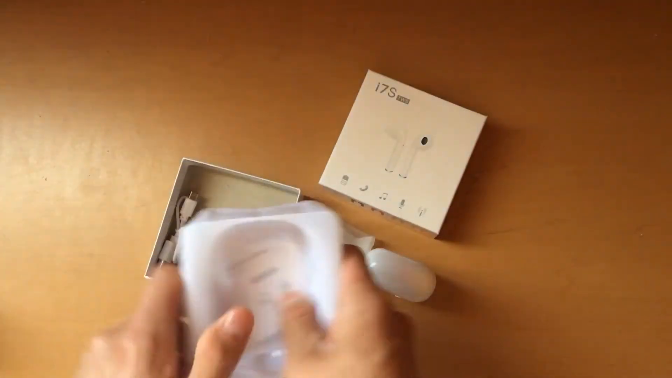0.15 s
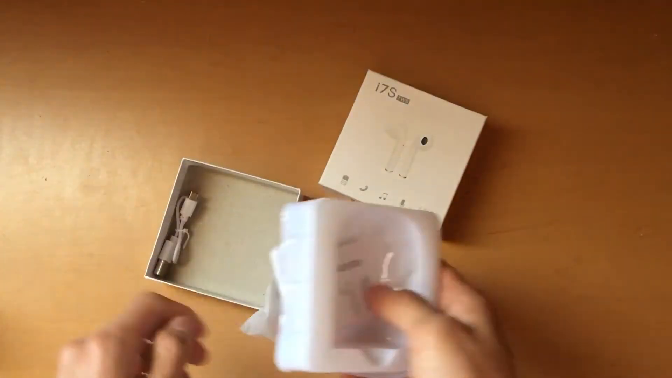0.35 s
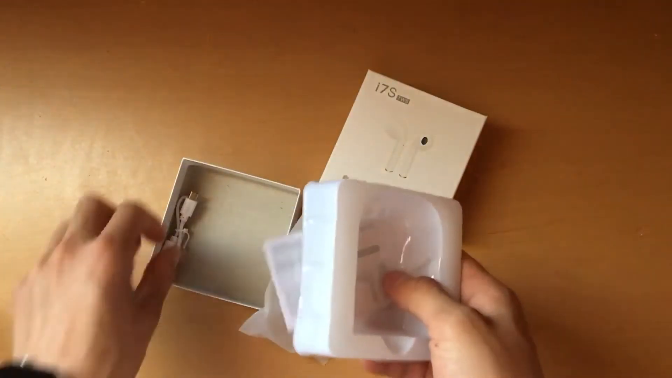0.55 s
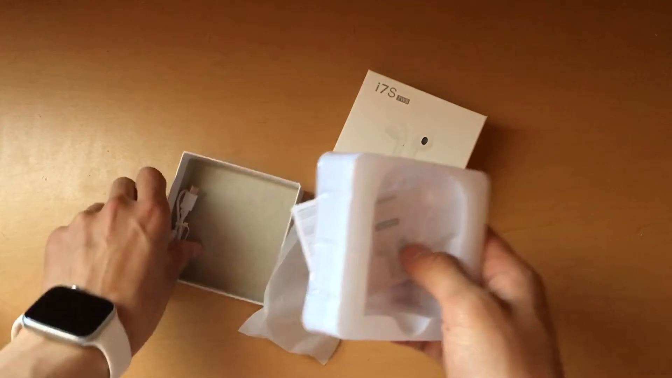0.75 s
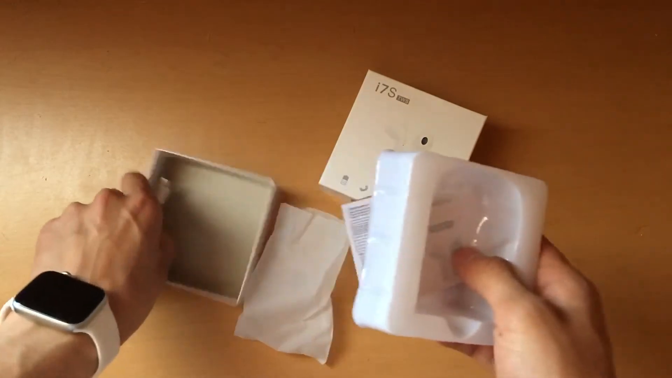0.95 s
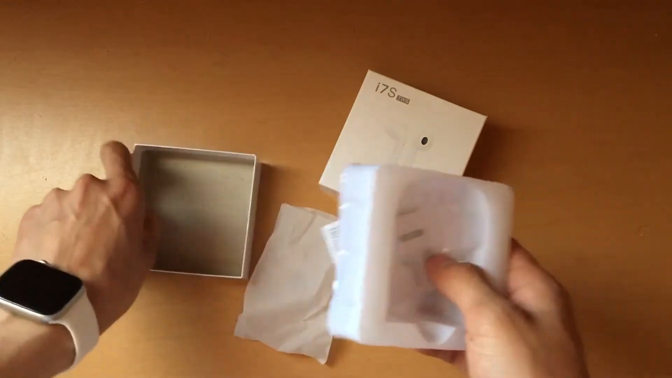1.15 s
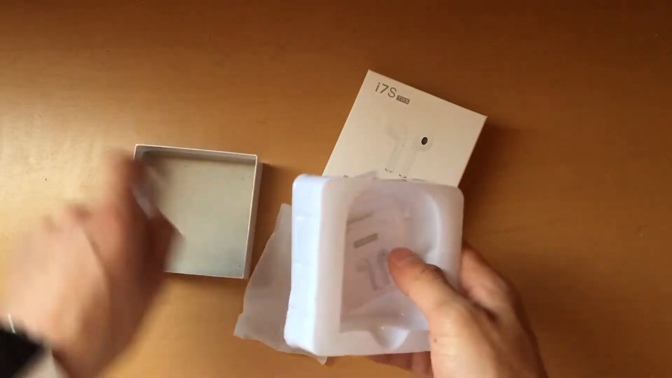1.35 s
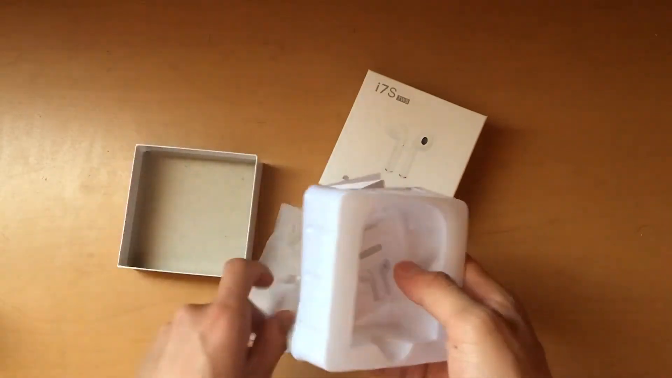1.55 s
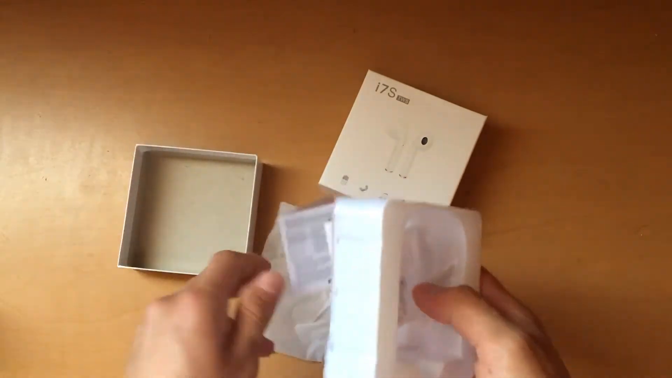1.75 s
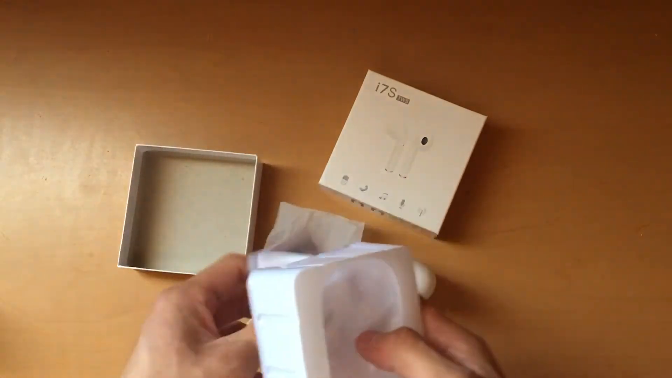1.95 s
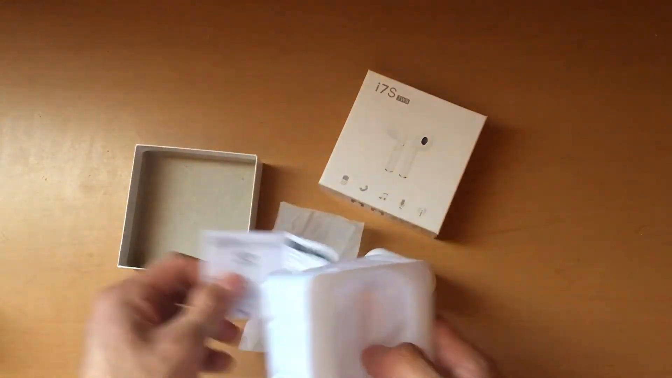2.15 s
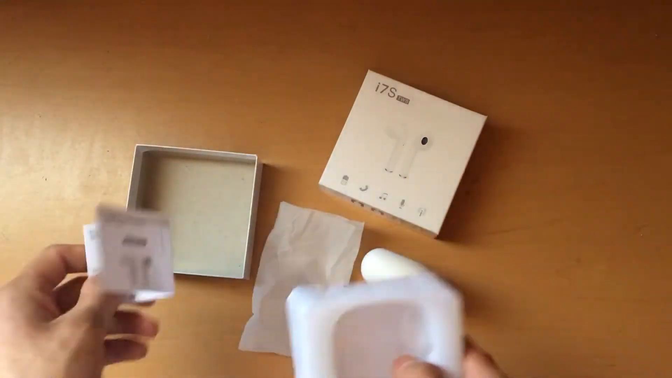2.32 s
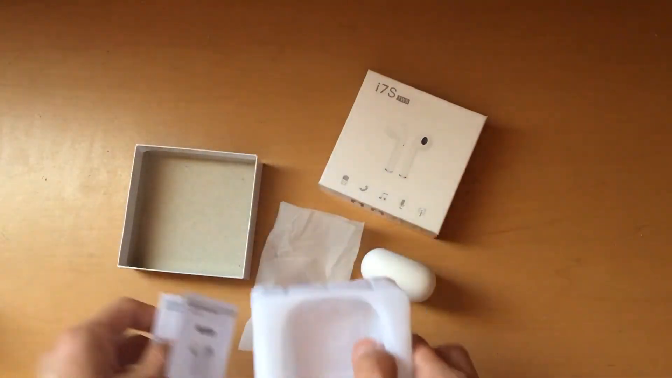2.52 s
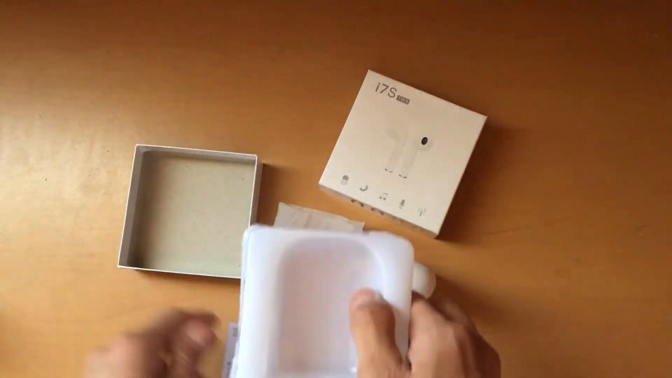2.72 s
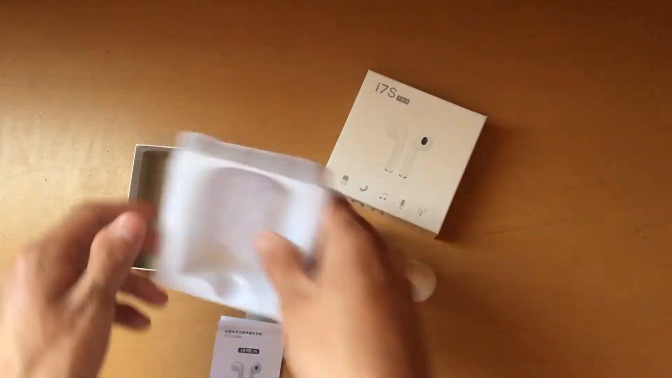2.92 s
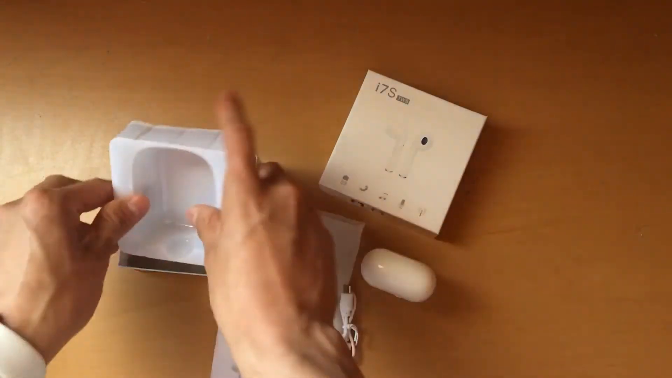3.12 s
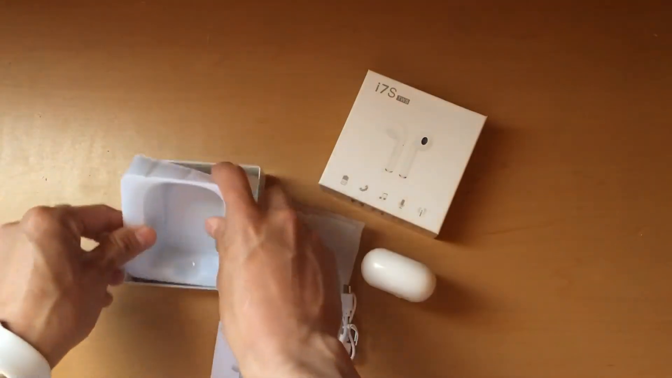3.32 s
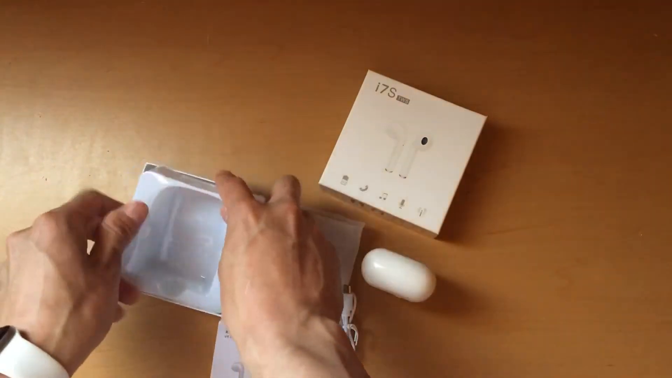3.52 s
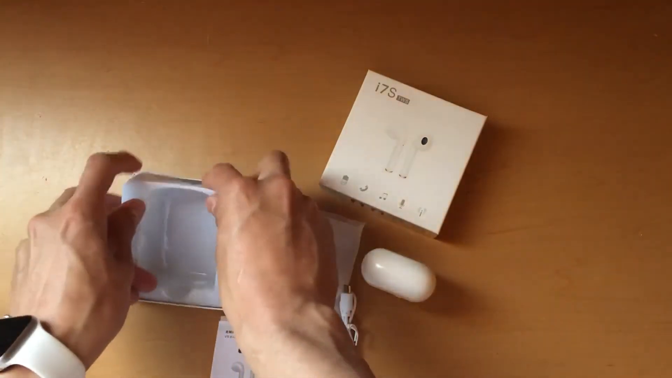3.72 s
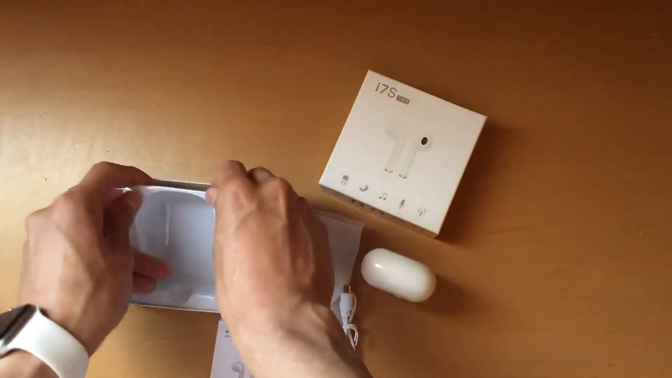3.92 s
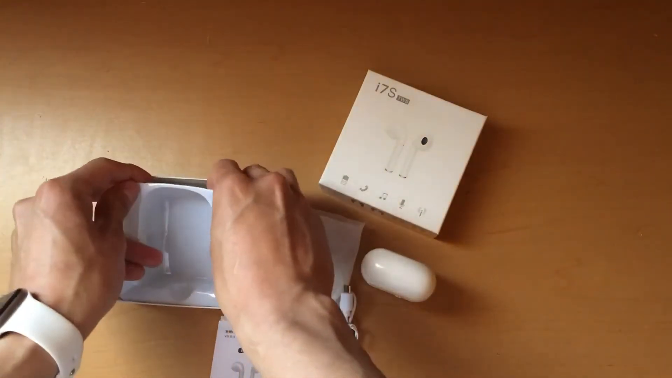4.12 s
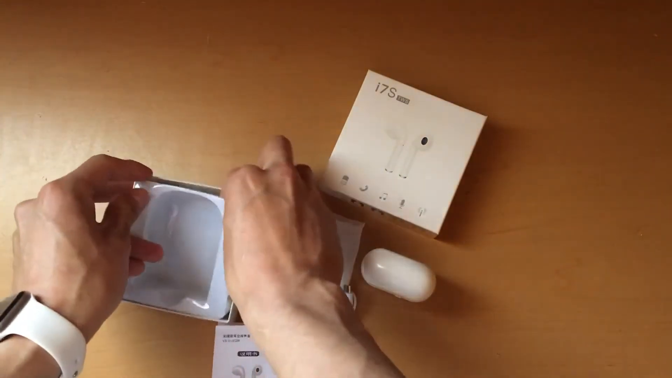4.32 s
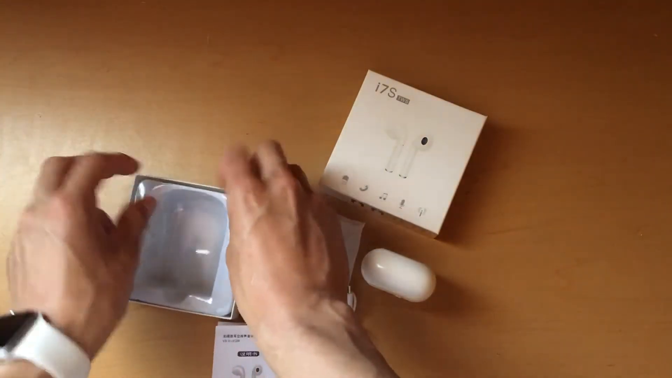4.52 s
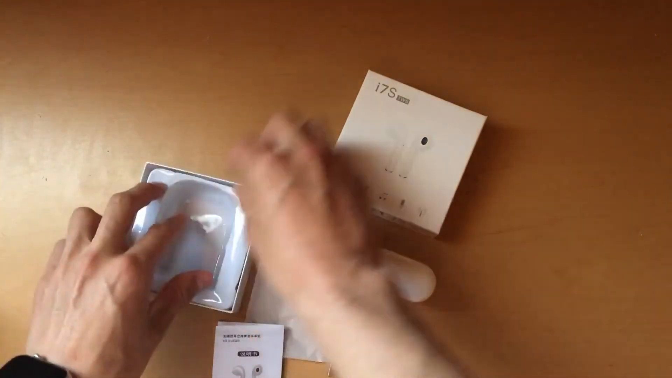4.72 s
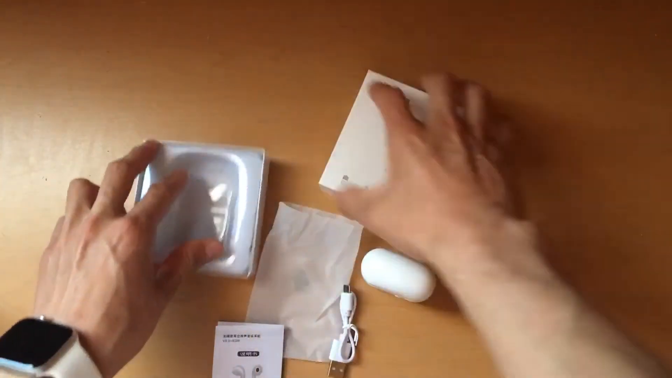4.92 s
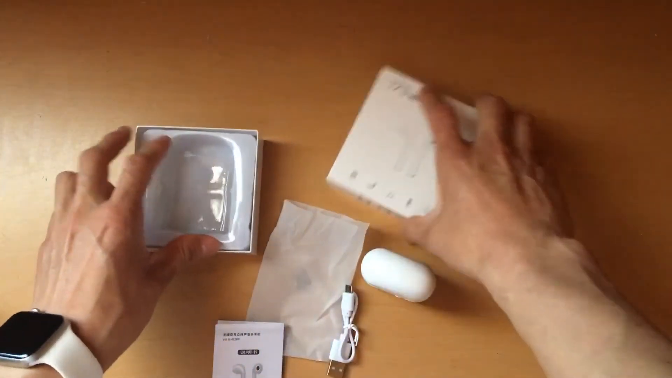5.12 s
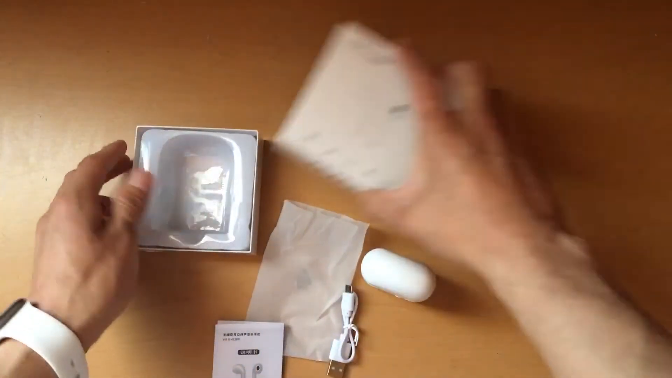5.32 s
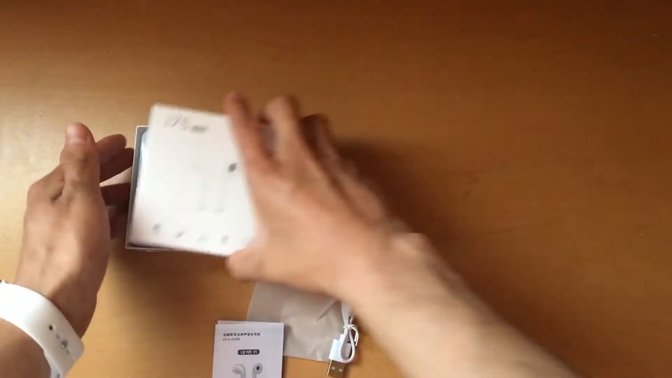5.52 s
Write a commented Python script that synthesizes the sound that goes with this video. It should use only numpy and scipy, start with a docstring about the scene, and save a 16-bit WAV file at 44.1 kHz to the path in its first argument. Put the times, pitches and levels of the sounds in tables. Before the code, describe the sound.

Unpacking sounds at a table: quick dry paper rubs, a sharp plastic crack with a dull thump, quieter rustling, then a busy run of crisp plastic snaps and coarse squeaky rubbing as the tray is forced back into its box. Muted box knocks sit underneath. A hollow cardboard scuff ends it, over faint low rumble and hiss, close and dry.

```python
"""In a small room, hands unpack a small cardboard box on a wooden table, close to the microphone.
A paper leaflet slides from under a thin plastic tray: slip noise in short strokes through a paper tone.
The tray crackles as it flexes (ringing bursts), its floor swings (sagging sines), and it scrapes back
into the box (coarser slip noise), ringing the air pocket beneath. The box knocks in low, decaying modes,
and at the end its lid is dragged on the table: slip noise through a hollow tone."""
import sys
import numpy as np
from scipy import signal
from scipy.fft import rfft, irfft, next_fast_len
from scipy.io import wavfile
from scipy.ndimage import uniform_filter1d, map_coordinates

SR = 44100
rng = np.random.default_rng(int(sys.argv[2]) if len(sys.argv) > 2 else 0)


def wrap_up_sound(samples):
    """Save the sound to the file named by the first command line argument, as 16-bit audio."""
    columns = np.atleast_2d(samples).T
    # keep every value between -1 and 1, then stretch to whole-number steps
    tamed = np.clip(columns, -1, 1)
    steps = np.round(tamed * 32767).astype(np.int16)
    wavfile.write(sys.argv[1], SR, steps)


N = 245149  # length [samples]


def amp(db):
    """Decibels to gain."""
    return 10 ** (np.asarray(db) / 20)


def unit(x):
    """Scale to rms 1."""
    return x / np.sqrt(np.mean(x ** 2) + 1e-20)


def along(points, hz):
    """Read (frequency, value) points on a log frequency axis."""
    point_hz, value = np.transpose(points)
    return np.interp(np.log(hz + 1), np.log(point_hz + 1), value)


def colour(x, points):
    """Shape x by a spectrum."""
    size = next_fast_len(N + 8192)
    gain = amp(along(points, np.fft.rfftfreq(size, 1 / SR)))
    return irfft(rfft(x, size) * gain, size)[:N]


def band(x, edges, order=3):
    """Causal band-pass."""
    return signal.sosfilt(signal.butter(order, edges, "bandpass", fs=SR, output="sos"), x)


def wobble(rate):
    """A smooth random curve, rate knots a second."""
    knots = rng.standard_normal(int(N * rate / SR) + 4)
    return map_coordinates(knots, [np.arange(N) * rate / SR])


def add(track, s, sound):
    """Mix a sound into the track at s seconds."""
    part = track[round(s * SR):][:len(sound)]
    part += sound[:len(part)]


def resonate(x, modes):
    """Drive (frequency [Hz], peak gain [dB], t60 [s]) resonances with x."""
    t = np.arange(SR // 2) / SR
    answer = np.zeros(len(t))
    for hz, db, t60 in modes:
        decay = amp(-60 * t / t60)
        answer += 2 * amp(db) * decay / decay.sum() * np.cos(2 * np.pi * hz * t)
    return signal.fftconvolve(x, answer)[:N]


# Colour of the background: (frequency [Hz], relative level [dB])
BACKGROUND_COLOUR = [(15, -51.5), (25, -11.5), (59, 0.5), (145, -1.5), (195, -10.5), (285, -13),
                     (476, -22.5), (591, -16), (796, -25), (2110, -24), (4740, -29), (5140, -31.5),
                     (10400, -33.5), (14800, -40.5), (16000, -56)]


def room_tone(level_db=-61):
    """Steady rumble and microphone hiss: noise shaped by one spectrum."""
    return amp(level_db) * unit(colour(rng.standard_normal(N), BACKGROUND_COLOUR))


def friction(slips_per_s, slip_db, spread_db, uneven_db):
    """Fibres catch and let go: tiny slips of uneven size over a rub that flutters with the pressure."""
    slipping = rng.random(N) < slips_per_s / SR
    size = amp(rng.uniform(-spread_db, spread_db, N))
    slips = slipping * rng.choice([-1, 1], N) * size
    rubbing = rng.standard_normal(N) + amp(slip_db) * unit(slips)
    return unit(rubbing * amp(uneven_db * wobble(90)))


def shifting(x, depth_db):
    """The resonances of a held sheet drift as the grip moves."""
    z = signal.stft(x, nperseg=512)[2]
    field = uniform_filter1d(rng.standard_normal(z.shape), size=3, axis=0)  # across frequency
    field = uniform_filter1d(field, size=24, axis=1)  # across time
    return signal.istft(z * amp(depth_db * unit(field)), nperseg=512)[1][:N]


# Low, rasp and hiss bands of a rub: (lower edge [Hz], upper edge [Hz])
RUB_BANDS = [(250, 1000), (1000, 5000), (5000, 16000)]


def rub(slips, tone, band_gains):
    """Friction through a surface's tone; pressure and speed shift weight between low, rasp and hiss."""
    voiced = colour(slips, tone)
    return sum(gain * unit(band(voiced, edges, order=4)) for gain, edges in zip(band_gains, RUB_BANDS))


def stroke(s, length, rise_s, sag_db, release_s):
    """Gain of one hand movement: it swells, sags while it lasts and dies away by 60 dB per release_s."""
    t = np.arange(N) / SR - s
    swell = np.clip(t / rise_s, 0, 1)
    sag = -sag_db * np.clip(t / length, 0, 1)
    release = -60 * np.clip((t - length) / release_s, 0, 2)
    return swell * amp(sag + release)


# Strokes of paper and fingers: (time [s], length [s], rasp level before the trim in paper() [dB],
# low over rasp [dB], hiss over rasp [dB])
PAPER_STROKES = [(0, 0.026, -61.5, 9.5, 3.5), (0.045, .21, -50, -1.5, -3.5), (0.261, 0.11, -49.5, -7, -6.5),
                 (0.357, 0.44, -68.5, -1.5, 0.5), (0.692, 0.06, -49, -11, -10), (0.76, 0.17, -56, -3, -3),
                 (0.938, 0.092, -49.5, -11.5, -11.5), (1.034, 0.044, -63, -0.5, -13),
                 (1.115, 0.099, -64.5, 6.5, -1.5), (1.281, .11, -57.5, -2.5, -8),
                 (1.405, 0.075, -63.5, -2.5, -3), (1.614, 0.091, -38.5, -11, -10.5),
                 (1.723, .055, -50, -5, -7), (1.828, 0.068, -47, -5, -9), (1.95, .05, -52.5, -1.5, 4),
                 (1.99, 0.14, -63, 0, 15.5), (2.04, 0.034, -50.5, 2.5, -3),
                 (2.099, 0.035, -44.5, -3.5, -8.5), (2.144, 0.11, -61, 0, 1), (2.263, 0.13, -61, -2.5, 2),
                 (2.518, 0.041, -60, -7, -2.5), (2.635, 0.047, -50, -12, 2.5),
                 (2.797, 0.14, -58, -8.5, -3.5), (2.943, 0.14, -53, -4, -4), (3.173, 0.085, -59, -4, -8)]
USUAL_STROKE_DB, USUAL_RISE_S = -49, 0.006
RISE_HALVES_DB = 6  # the firmer the stroke, the faster it bites


def paper_gains():
    """Low, rasp and hiss gains of the paper strokes; the strongest stroke at each moment wins."""
    out = np.zeros((len(RUB_BANDS), N))
    for s, length, db, low_db, hiss_db in PAPER_STROKES:
        rise_s = USUAL_RISE_S * 2 ** ((USUAL_STROKE_DB - db) / RISE_HALVES_DB)
        shape = stroke(s, length, rise_s, sag_db=2, release_s=0.073)
        out = np.maximum(out, np.outer(amp([db + low_db, db, db + hiss_db]), shape))
    return out


# Colour of paper on card and plastic: (frequency [Hz], relative level [dB])
PAPER_COLOUR = [(200, -18), (340, -2), (800, -13), (1530, 2.5), (1850, 3), (2350, 3.5), (2900, 0),
                (3450, 1.5), (4600, -10.5), (5650, -12.5), (7200, -14.5), (12000, -17), (16000, -21.5)]


def paper(band_gains):
    """The leaflet and fingers slide over card and plastic in short strokes with a fine grain."""
    slips = shifting(friction(slips_per_s=700, slip_db=-2, spread_db=7, uneven_db=1.5), depth_db=2.8)
    return amp(-1.06) * rub(slips, PAPER_COLOUR, band_gains)


USUAL_RING_HZ = 1962
TICKS_PER_S, TICK_T60_S = 34, 0.023
TICK_DB, TICK_SPREAD_DB = -2.5, 4.5  # over the rasp gain, and scatter either way
TICK_BRIGHT_DB = -8.5  # per band, with the same scatter


def ticks(rasp, spread_octaves=0.27):
    """Faint snaps at chance moments, as strong as the rub that sets them off; rows like TRAY_SNAPS."""
    count = int(TICKS_PER_S * N / SR)
    place, pitch, size, bright = rng.uniform(-1, 1, (count, 4)).T
    s = (np.arange(count) + .5 + place / 2) / TICKS_PER_S
    rub_db = 20 * np.log10(rasp[np.minimum((s * SR).astype(int), N - 1)] + 1e-9)
    db = rub_db + TICK_DB + TICK_SPREAD_DB * size
    hz = USUAL_RING_HZ * 2 ** (spread_octaves * pitch)
    bright_db = TICK_BRIGHT_DB + TICK_SPREAD_DB * bright
    return list(zip(s, hz, [TICK_T60_S] * count, db, bright_db))


# Snaps of the tray and box edges: (time [s], ring [Hz], ring t60 [s], body level [dB],
# brightness [dB per band])
TRAY_SNAPS = [(0.0487, 1530, 0.022, -45.5, -9), (0.0634, 2390, 0.014, -35.5, -2),
              (0.1191, 3590, 0.016, -42.5, 2), (0.175, 1810, 0.01, -42, -13),
              (0.1969, 1720, 0.05, -41, -11), (0.2347, 2490, 0.03, -38, -4),
              (0.3188, 2360, 0.031, -41, -12.5), (0.6293, 1560, 0.014, -41, -8),
              (1.0844, 2310, 0.037, -44, -17), (1.2971, 2210, 0.04, -47.5, -7.5),
              (1.5043, 3580, 0.01, -47, -7.5), (1.6387, 2100, 0.016, -27.5, -6.5),
              (1.6652, 2306, 0.014, -31.5, -9), (1.7331, 1495, 0.029, -42, -5),
              (1.7881, 3500, 0.024, -48, -1), (1.8315, 2290, 0.015, -32, -12.5),
              (2.1053, 1410, 0.018, -40.5, -3.5), (2.1846, 1690.0, 0.018, -57.5, 2.5),
              (2.7437, 2850, 0.015, -48.5, -11), (2.9504, 2430, 0.023, -35, -2.5),
              (2.9657, 3200.0, 0.011, -45, 4.5), (2.9759, 2060, 0.01, -37.5, -17.5),
              (3.0005, 4100, 0.021, -33, -4), (3.057, 1690, 0.021, -41.5, -8),
              (3.0838, 2385, 0.018, -29.5, -0.5), (3.1804, 1534, 0.018, -41, -14),
              (3.2757, 2120, 0.015, -38.5, -8), (3.2935, 1495, 0.022, -37, -4.5),
              (3.3185, 1450, 0.022, -34, -5), (3.3464, 2010, 0.025, -37.5, -3.5),
              (3.4035, 1930, 0.026, -30.5, -10.5), (3.4458, 1960, 0.025, -26, -10),
              (3.4728, 3670, 0.025, -53.5, 5.5), (3.486, 1360, 0.016, -44.5, -11.5),
              (3.516, 1300, 0.017, -42.5, -14.5), (3.541, 1130, 0.028, -41.5, -17),
              (3.5822, 2007, 0.015, -17.5, -3), (3.6001, 1930, 0.017, -32, -5.5),
              (3.6674, 1820, 0.019, -33, -8.5), (3.692, 1860, 0.033, -39.5, -13),
              (3.7094, 1350, 0.011, -34, 0.5), (3.7751, 2040, 0.012, -37, -15),
              (3.8305, 1350, 0.017, -42.5, -5.5), (3.8559, 1345, 0.025, -37, -9),
              (3.8949, 1760.0, 0.017, -26.5, -0.5), (3.9104, 1780, 0.013, -27.5, 0.5),
              (3.9383, 1990, 0.031, -30, -10.5), (3.9632, 1940, 0.026, -35, -1),
              (3.989, 2400, 0.036, -40, -10), (4.0032, 1514, 0.036, -31, -13.5),
              (4.0447, 2120, 0.017, -48.5, -0.5), (4.1264, 1330, 0.0093, -43, -21.5),
              (4.1501, 1730, 0.021, -39, -13.5), (4.2099, 2220, 0.011, -43.5, -6),
              (4.2336, 1575, 0.01, -31.5, -10), (4.2481, 1790.0, 0.021, -29, -5),
              (4.2808, 2780, 0.018, -42.5, 5), (4.3015, 1680, 0.028, -27.5, -0.5),
              (4.312, 1350, 0.052, -30, -14), (4.336, 2020, 0.015, -38.5, -12),
              (4.4173, 1920, 0.029, -22, -5), (4.4251, 1914, 0.015, -23.5, -15.5),
              (4.5657, 1775, 0.019, -41, -3.5), (4.5943, 1910.0, 0.025, -42, -12.5),
              (4.6913, 2040, 0.014, -24.5, -17.5), (4.8118, 2030, 0.017, -39, -4.5)]
# Body, edge and air of a snap: (lower edge [Hz], upper edge [Hz])
SNAP_BANDS = [(600, 2800), (2800, 7000), (7000, 16000)]
# Modes of a buckling plastic panel: (multiple of its ring [ratio], level [dB])
PANEL_MODES = [(0.612, -14), (.86, -6.5), (1.002, 1.5), (1.14, -7), (1.75, 0), (2.3, -3)]
BUCKLE_S = 0.002  # a buckle takes a moment to run through the sheet
EDGE_DB, EDGE_DB_PER_OCTAVE = 2, 7  # small, high panels stress the edge band


def snaps(rows, crack_db, crack_life=0.99):
    """Each buckle is a burst of tiny cracks that rings one panel of the tray for a few cycles."""
    out, t = np.zeros(N), np.arange(int(.05 * SR)) / SR
    head = int(.008 * SR)  # a snap's levels are those of its first 8 ms
    swell = 1 - np.exp(-(t / BUCKLE_S) ** 2)
    ratio, mode_db = np.transpose(PANEL_MODES)
    bursts, levels = [], []
    for s, hz, t60, db, bright_db in rows:
        # higher modes die sooner
        fade = amp(mode_db[:, None] - 60 * np.outer(ratio, t) / t60)
        cycles = np.outer(hz * ratio, t) + rng.random((len(ratio), 1))
        ring = np.sum(fade * np.sin(2 * np.pi * cycles), axis=0)
        crack = amp(crack_db - 60 * t / (t60 * crack_life)) * rng.standard_normal(len(t))
        bursts.append(swell * (ring + crack))
        edge_db = EDGE_DB + EDGE_DB_PER_OCTAVE * np.log2(hz / USUAL_RING_HZ)
        levels.append((db, db + bright_db + edge_db, db + 2 * bright_db))
    for edges, band_db in zip(SNAP_BANDS, np.transpose(levels)):
        for row, db, part in zip(rows, band_db, band(np.array(bursts), edges)):
            add(out, row[0], amp(db) * part / np.std(part[:head]))
    return out


# How well the tray closes the pocket, held level before and after: (time [s], share [0-1])
SEATED = [(3.2, 0.31), (3.6, 0.65), (4.3, 0.77)]
# Air between tray and box: (frequency [Hz], peak gain [dB], t60 [s])
POCKET_MODES = [(560, -2, 0.034), (660, 3.5, 0.094), (849, -7.5, 0.24), (1035, 2.5, 0.36),
                (1127, 1.5, 0.39), (1230, -0.5, .32), (1360, 3, 0.14), (1430, 2, 0.067),
                (1610, -4.5, 0.061), (1765, -7, 0.12), (1922, -9, 0.16), (2200, -8.5, 0.16)]


def air_pocket(x):
    """The trapped air rings with the tray's sounds, more strongly the better the tray closes it."""
    seated = np.interp(np.arange(N) / SR, *np.transpose(SEATED))
    return resonate(seated * x, POCKET_MODES)


# Dull knocks of box and tray: (time [s], level of the ring at the blow [dB], favoured pitch [Hz])
KNOCKS = [(.072, -44.5, 340), (.125, -50, 340), (.2, -43, 456), (0.238, -55, 280), (0.634, -37.5, 200),
          (.642, -38, 333), (1.459, -53, 420), (1.64, -34.5, 215), (1.667, -37, 200), (1.831, -41.5, 252),
          (2.104, -46, 516), (2.778, -49.5, 495), (2.975, -40.5, 433), (3.004, -45.5, 400),
          (3.088, -36, 346), (3.587, -38.5, 420), (3.855, -40, 256), (3.895, -41.5, 233),
          (4.252, -42.5, 258), (4.418, -40.5, 303), (4.59, -41.5, 308), (4.694, -46, 257)]
# Modes of the box on the table: (frequency [Hz], level [dB])
BOX_MODES = [(145, 8), (228, -1.5), (300, -2.5), (365, -2.5), (450, -6), (550, -1.5), (670, -10)]
KNOCK_T60_S = 0.074


def knocks(rise=0.00067, puff_db=-4, octave_db=11):
    """Soft blows ring the low modes of the box; each favours the modes near its own pitch."""
    out, t = np.zeros(N), np.arange(SR // 4) / SR
    hz, mode_db = np.transpose(BOX_MODES)
    for s, db, centre in KNOCKS:
        distance_db = octave_db * np.log2(hz / centre) ** 2
        strength = amp(mode_db - distance_db + rng.normal(0, 1, len(hz)))
        cycles = np.outer(hz, t) + rng.random((len(hz), 1))
        ring = unit(strength @ np.sin(2 * np.pi * cycles))
        puff = amp(puff_db) * unit(band(rng.standard_normal(len(t)), (centre / 2, centre * 2), order=2))
        envelope = amp(db - 60 * t / KNOCK_T60_S) * (1 - np.exp(-t / rise))
        add(out, s, envelope * (ring + puff))
    return out


# Pops of the tray's floor: (time [s], level before the band-pass [dB], starting pitch [Hz], t60 [s])
FLOOR_SWINGS = [(0.629, -39.5, 110, 0.1), (1.641, -40, 151, 0.059), (1.666, -28.5, 141, 0.16),
                (1.734, -40, 118.7, 0.34), (3.087, -57, 153, 0.096), (3.59, -47.5, 137, 0.42),
                (3.861, -45.5, 136, 0.21), (4.27, -46, 142, 0.44), (4.689, -45.5, 148, 0.12)]


def tray_floor(sag=0.069, sag_time=0.11, rise=0.0006):
    """The floor of the tray swings like a drum skin, its pitch sagging as the grip relaxes."""
    out, t = np.zeros(N), np.arange(SR // 3) / SR
    for s, db, hz, t60 in FLOOR_SWINGS:
        pitch = hz * (1 - sag * (1 - np.exp(-t / sag_time)))
        envelope = amp(db - 60 * t / t60) * (1 - np.exp(-t / rise))
        add(out, s, envelope * np.sin(2 * np.pi * np.cumsum(pitch) / SR))
    return band(out, (70, 1000), order=2)


# Pushes that drive the tray down the box walls: (time [s], length [s],
# rasp level before the trim in tray_scrape() [dB], hiss over rasp [dB])
TRAY_PUSHES = [(3.265, 0.22, -47.5, -5), (3.486, .07, -49.5, -8), (3.556, 0.045, -37, -7.5),
               (3.653, 0.089, -41, -18), (3.748, 0.091, -50, -4), (3.845, 0.077, -42.5, -4),
               (3.942, 0.089, -46, -15), (4.125, 0.075, -52, -10.5), (4.2, .03, -46, -4),
               (4.216, 0.094, -35.5, -10.5), (4.387, 0.062, -50, -4.5), (4.549, 0.048, -45, -9),
               (4.651, 0.061, -45, -7.5), (4.774, 0.072, -51, -7), (4.87, 0.1, -62.5, 5)]
USUAL_PUSH_DB, PUSH_LOW_DB = -45.5, -52.5
LOW_FOLLOWS = 0.6  # dB per dB: the box's low rub grows more slowly than the rasp


def push_gains():
    """Low, rasp and hiss gains of the pushes; the tray creeps on after the hand lets go."""
    out = np.zeros((len(RUB_BANDS), N))
    for s, length, db, hiss_db in TRAY_PUSHES:
        low_db = PUSH_LOW_DB + LOW_FOLLOWS * (db - USUAL_PUSH_DB)
        shape = stroke(s, length, rise_s=0.01, sag_db=4.5, release_s=0.33)
        out = np.maximum(out, np.outer(amp([low_db, db, db + hiss_db]), shape))
    return out


# Colour of the tray on the box walls: (frequency [Hz], relative level [dB])
TRAY_COLOUR = [(200, -7.5), (450, -2.5), (700, -4), (1300, 1), (1700, 7), (2150, 10.5), (2700, -5.5),
               (3600, -5.5), (5000, -18.5), (6500, -20), (8000, -23), (12500, -25), (16000, -34.5)]


def tray_scrape(band_gains):
    """The tight tray creeps down the box walls in coarser slips."""
    slips = shifting(friction(slips_per_s=450, slip_db=1, spread_db=5, uneven_db=2), depth_db=2.5)
    return amp(0.04) * rub(slips, TRAY_COLOUR, band_gains)


# The lid dragged on the table: (time [s], level [dB])
LID_DRAG = [(4.99, -82), (5.02, -51.5), (5.06, -50), (5.1, -58.5), (5.125, -37.5), (5.15, -42.5),
            (5.195, -42.5), (5.22, -58.5), (5.26, -64), (5.4, -84)]
# Colour of the hollow lid: (frequency [Hz], relative level [dB])
LID_COLOUR = [(71, -48.5), (120, -21.5), (286, -18), (323, -7.5), (412, -18.5), (629, -0.5), (942, -9),
              (1020, -8.5), (1150, -17.5), (1250, -10), (1830, -15.5), (2030, -12), (4940, -34),
              (6820, -30.5), (15000, -43.5)]


def lid():
    """The hollow lid judders across the table: slip noise under an uneven level."""
    slips = friction(slips_per_s=490, slip_db=-6, spread_db=0.5, uneven_db=1.0)
    s, db = np.transpose(LID_DRAG)
    level_db = np.interp(np.arange(N) / SR, s, db, left=-120, right=-120)
    return amp(level_db) * unit(colour(slips, LID_COLOUR))


# Decay of the room: (frequency [Hz], t60 [s])
ROOM_T60 = [(120, 0.61), (400, 0.11), (1500, 0.21), (5000, 0.16), (15000, 0.14)]
# Colour of the room's answer: (frequency [Hz], relative level [dB])
ROOM_COLOUR = [(100, -1), (350, -0.5), (700, -0.5), (1200, 2), (2000, -1), (3500, -1), (8000, -4),
               (15000, 2)]


def room(x, delay=.005, build=0.00033):
    """The table and near walls answer; the tail is fresh noise every quarter second, crossfaded."""
    out, step = np.zeros(N), SR // 4
    for start in range(0, N + step, step):
        hz, t, z = signal.stft(rng.standard_normal(SR // 3), SR, nperseg=256)
        decay = amp(along(ROOM_COLOUR, hz)[:, None] - 60 * t / along(ROOM_T60, hz)[:, None])
        tail = signal.istft(z * decay, SR, nperseg=256)[1]
        tail = tail * (1 - np.exp(-np.arange(len(tail)) / SR / build))
        near = np.arange(max(start - step, 0), min(start + step, N))
        piece = x[near] * np.cos(np.pi / 2 * (near - start) / step)
        add(out, near[0] / SR + delay, signal.fftconvolve(piece, tail / np.linalg.norm(tail)))
    return out


# Standing waves of the room: (frequency [Hz], peak gain [dB], t60 [s])
ROOM_MODES = [(141, -9, .35), (344.9, 5, 0.44), (441, -2.5, .28)]


def scene():
    """Paper, tray, box and lid are mixed; the handling sounds feed the near walls and standing waves."""
    pressure = amp(1.4 * wobble(38))  # the pressure of the fingers is never quite even
    strokes, pushes = pressure * paper_gains(), pressure * push_gains()
    buckles = list(TRAY_SNAPS) + ticks(strokes[1] + pushes[1])
    ringing = snaps(buckles, crack_db=1)
    # a panel beams its ring one way; the pocket and the walls get mostly the broad crack
    cracking = snaps(buckles, crack_db=12)
    scrape = tray_scrape(pushes)
    pocket = air_pocket(cracking + scrape)
    body = scrape + pocket + knocks() + paper(strokes) + lid()
    walls = amp(-10) * room(cracking + body)
    standing_waves = resonate(body, ROOM_MODES)
    return (ringing + body + walls + standing_waves + tray_floor() + room_tone())[None]


# Response of the small microphone: (frequency [Hz], gain [dB])
MICROPHONE = [(20, -14), (50, 2), (13000, -0.5), (14500, -2.5), (16000, -7)]
TOP_HZ = 16000  # nothing passes from here up


def record(dry):
    """The loudest snap saturates softly; the small microphone dulls both ends below the band limit."""
    rounded = dry / (1 + (dry / .8) ** 4) ** (1 / 4)
    size = next_fast_len(N + 8192)
    hz = np.fft.rfftfreq(size, 1 / SR)
    response = amp(along(MICROPHONE, hz)) * (hz < TOP_HZ)
    return irfft(rfft(rounded, size) * response, size)[:, :N]


dry = scene()
out = record(dry)
wrap_up_sound(out)
```